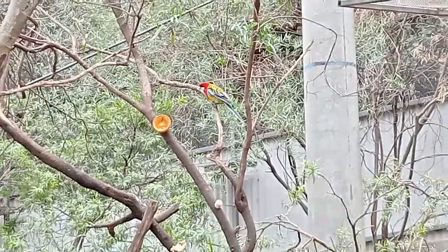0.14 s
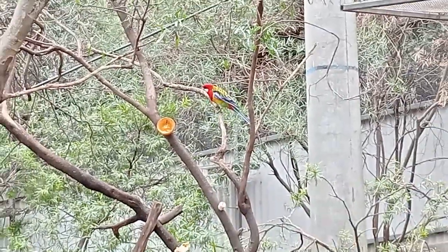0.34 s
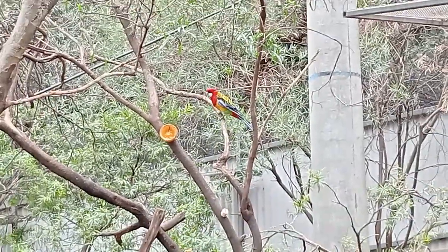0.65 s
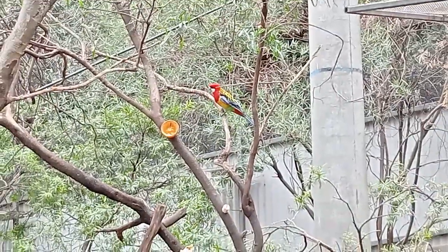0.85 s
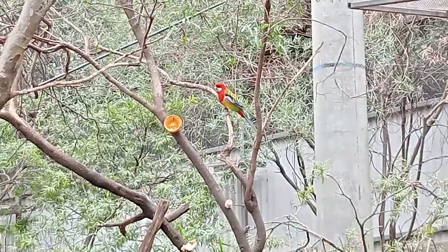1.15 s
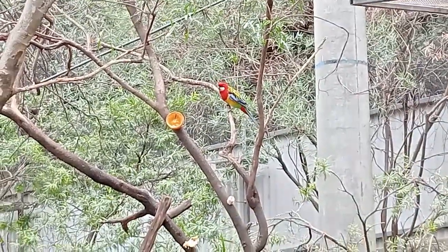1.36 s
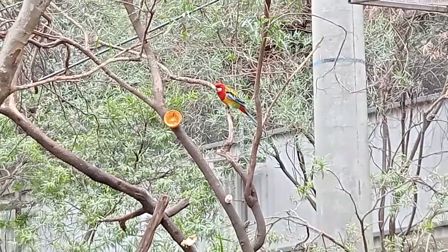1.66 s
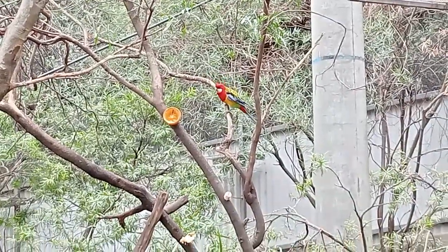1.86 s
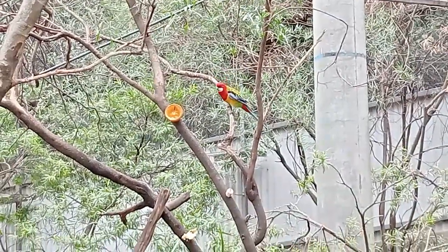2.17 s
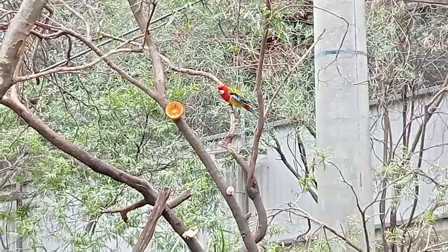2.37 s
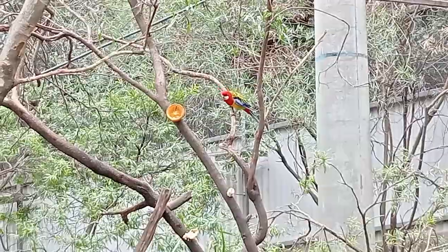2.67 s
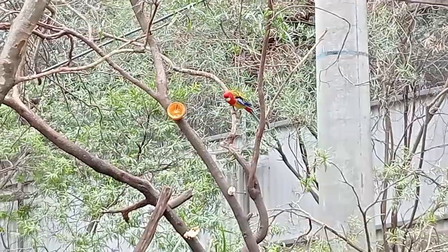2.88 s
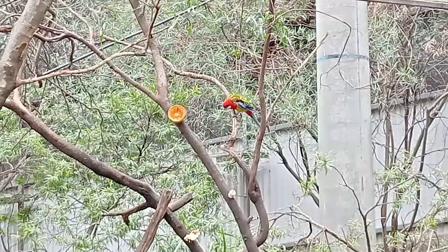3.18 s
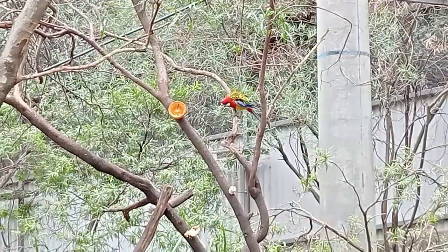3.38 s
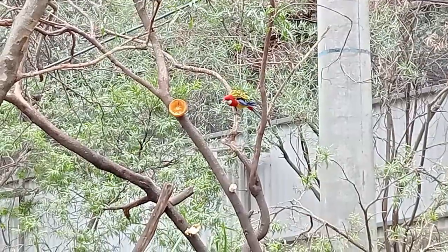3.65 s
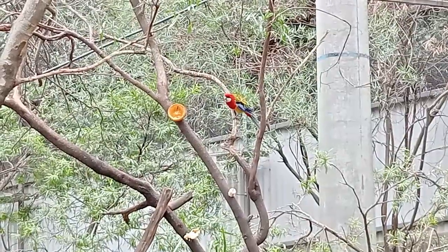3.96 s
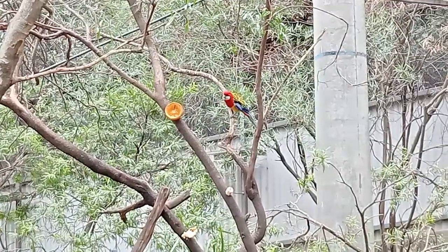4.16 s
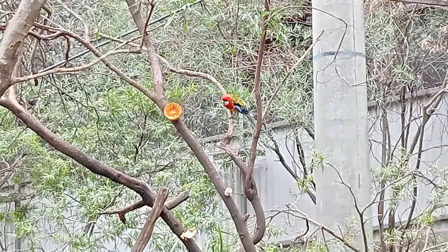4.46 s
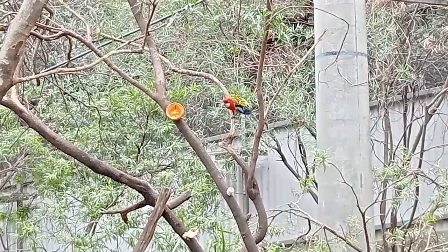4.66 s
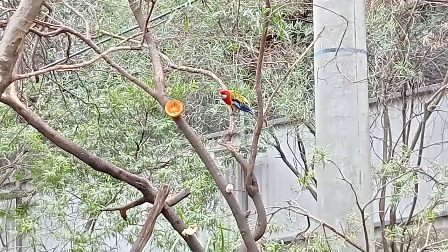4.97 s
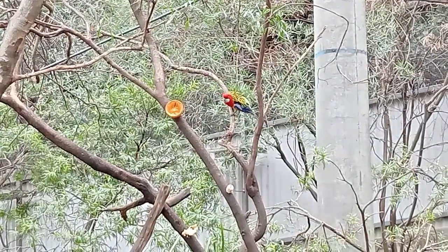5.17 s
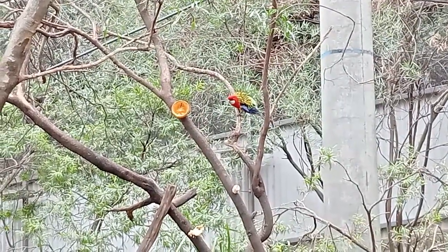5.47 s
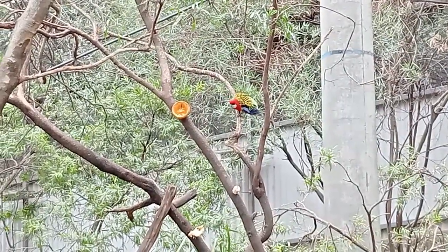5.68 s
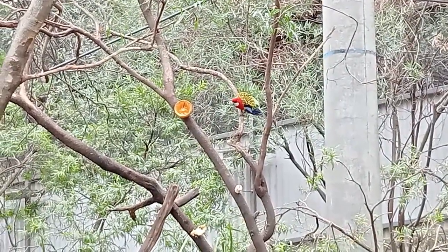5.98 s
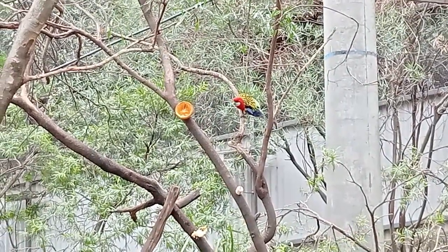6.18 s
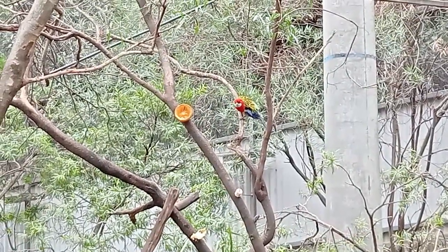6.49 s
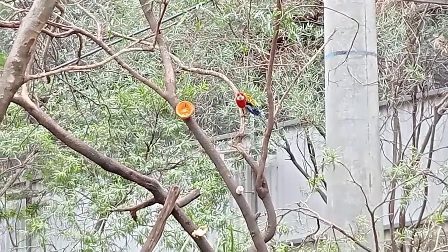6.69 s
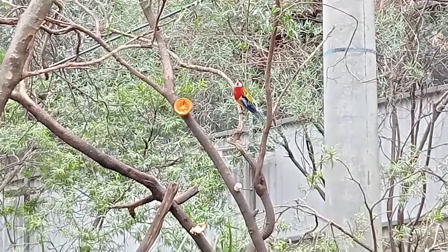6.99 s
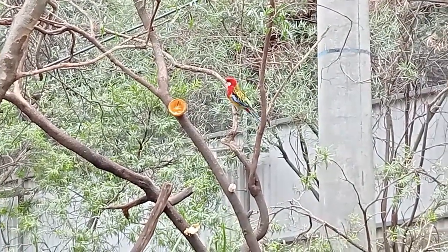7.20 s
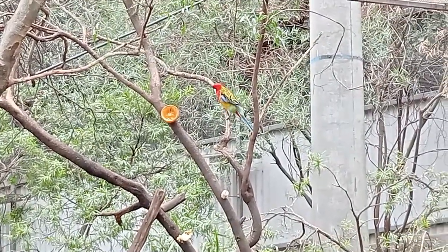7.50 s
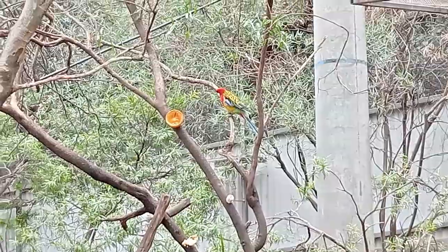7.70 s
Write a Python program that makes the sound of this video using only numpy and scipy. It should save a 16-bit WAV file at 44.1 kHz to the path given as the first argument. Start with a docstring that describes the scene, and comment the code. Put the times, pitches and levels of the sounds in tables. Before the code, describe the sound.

Outdoors among trees and walls, a parrot's clear, upward-scooping hoots stand out in front: three at first, then after a gap a steady run of eight. Softer whoops and hoarse, sinking wails come from farther away, with thin squeaks, whistles and rasps from other birds. A brief screech and a high whistle come just before the hoots resume. Very faint insect buzzing and leaf rustle lie underneath, and the calls echo lightly.

```python
"""A parrot among trees repeats short, nearly pure hoots, each one sliding up in pitch and drooping.
Whoops, lower hoots and hoarse, falling calls answer from farther off. Other birds squeak, whistle,
squawk and rasp above it, and one screeches; their unsteady voices make the pitch flutter.
An insect's clicking wings give two bouts of buzzing, and leaves rustle.
Walls and trees echo over a faint outdoor hush."""
import sys
import numpy as np
from scipy import signal
from scipy.fft import rfft, irfft, next_fast_len
from scipy.io import wavfile
from scipy.ndimage import map_coordinates

SR = 44100
rng = np.random.default_rng(int(sys.argv[2]) if len(sys.argv) > 2 else 0)


def put_to_file(sound):
    """Save the sound as 16-bit audio at rate SR, in the file named by the first command-line argument."""
    columns = np.atleast_2d(sound).T  # one column per channel
    safe = np.clip(columns, -1, 1)
    whole_steps = np.round(safe * 32767)
    wavfile.write(sys.argv[1], SR, whole_steps.astype(np.int16))


N = 345744


def amp(db):
    """Turn decibels (dB) into a number to multiply a sound by."""
    return 10 ** (np.asarray(db) / 20)


def unit(x):
    """Scale x so that its average strength (rms) is 1."""
    return x / np.sqrt(np.mean(x ** 2) + 1e-20)


def add(track, s, sound):
    """Mix a sound into the track, starting at s seconds."""
    start = int(np.clip(s * SR, 0, N))
    track[start:start + len(sound)] += sound[:N - start]


def coloured(x, points):
    """Turn the lows and highs of x up or down along a curve of (Hz, dB) points."""
    hz, db = np.transpose(points)
    size = next_fast_len(len(x) + 4096)
    gain = amp(np.interp(np.log(np.fft.rfftfreq(size, 1 / SR) + 1), np.log(hz), db))
    return irfft(rfft(x, size) * gain, size)[:len(x)]


def wobble(count, rate):
    """A smooth curve, count samples long, through rate random values a second."""
    values = rng.standard_normal(int(count * rate / SR) + 4)
    return map_coordinates(values, [np.arange(count) * rate / SR])


def progress(length):
    """A straight climb from 0 to 1 over a length in seconds."""
    return np.linspace(0, 1, max(int(length * SR), 64))


def ramp(t, seconds):
    """A smooth rise from 0 to 1 in the given time."""
    return np.sin(np.pi / 2 * np.clip(t / seconds, 0, 1)) ** 2


def around_top(u, top_at):
    """Two curves over a call's progress u: one falls from 1 to 0 up to the top, one rises after it."""
    return np.maximum(1 - u / top_at, 0), np.maximum((u - top_at) / (1 - top_at), 0)


def gates(rows, soft):
    """A loudness curve with one soft-edged swell for each row of start, length (seconds) and dB."""
    gain = np.zeros(N)
    for s, length, db in rows:
        add(gain, s, amp(db) * signal.windows.tukey(len(progress(length)), soft))
    return gain


def throbbing(count, hz):
    """The uneven beat of a rasping voice, between -1 and 1."""
    return np.sin(2 * np.pi * np.cumsum(hz * (1 + 0.19 * wobble(count, 60))) / SR)


def tone(hz, overtones_db=()):
    """A tone that follows the pitch curve hz; any overtones lie at 2, 3, .. times that pitch."""
    phase = 2 * np.pi * np.cumsum(hz) / SR
    partials = enumerate([0, *overtones_db], 1)
    return np.sqrt(2) * sum(amp(db) * np.sin(k * phase) * (k * hz < SR / 2) for k, db in partials)


def calls(rows, rough, flutter_hz, overtones_db=(), taper=0.14, arch_oct=0):
    """Gliding or arched notes; a bird's unsteady voice box makes their pitch and loudness flutter."""
    voice = np.zeros(N)
    tremble_db = min(100 * rough, 2.5)
    for s, length, pitch_hz, glide_oct, db in rows:
        u = progress(length)
        octaves = glide_oct * (u - .5) - arch_oct * (2 * u - 1) ** 2
        hz = pitch_hz * 2 ** octaves * (1 + rough * wobble(len(u), flutter_hz))
        swell = np.abs(np.sin(np.pi * u)) ** taper * amp(db + tremble_db * wobble(len(u), flutter_hz))
        add(voice, s, swell * tone(hz, overtones_db))
    return voice


def echo(x, t60, delay):
    """Sound scattered by trees and walls: it starts after delay seconds and fades 60 dB in t60 seconds."""
    t = np.arange(SR) / SR
    tail = rng.standard_normal(SR) * amp(-60 * t / t60) * (t > delay)
    return signal.fftconvolve(x, tail / np.linalg.norm(tail))[:N]


def hush():
    """Far outdoor noise, and one soft low bump of air on the microphone."""
    # The tone colour of the far noise. Each row: frequency in Hz, relative level in dB.
    air_colour = [(22, -43), (45, -15.5), (100, -4), (300, -7), (1000, -7.5), (3500, -20.5), (8000, -23.5),
                  (15400, -25)]
    air = unit(coloured(rng.standard_normal(N), air_colour)) * amp(-65 + 3.0 * wobble(N, 13))
    bump = unit(coloured(rng.standard_normal(N), [(30, -50), (70, -5.5), (700, -54.5)]))
    return air + bump * gates([(.03, .13, -60)], soft=0.31)


def breeze(lull_db=-5):
    """A loudness curve for the moving air: steady, but sinking in the lulls."""
    # Moments when the air falls still. Each row: start in seconds, length in seconds.
    lulls = [(0.994, .28), (5.427, 0.54), (6.058, 0.23)]
    return amp(lull_db * gates([(s, length, 0) for s, length in lulls], soft=0.7))


def foliage(crackles_per_s=220, crackle_db=15):
    """Leaves stir and brush together with tiny snaps; twigs and beaks give short, dry ticks."""
    # Leaves brushing, and at 2.22 s a bird's brief scratchy squeak. Each row: start in seconds, length in
    # seconds, relative level in dB.
    rustles = [(.54, 0.032, -68), (.945, 0.044, -69.5), (2.22, 0.021, -64), (2.345, 0.048, -68.5),
               (2.43, 0.049, -65.5), (3.37, 0.1, -65.5), (6.445, 0.079, -65), (7.45, 0.042, -67.5)]
    # The tone colour of the leaves. Each row: frequency in Hz, relative level in dB.
    leaf_colour = [(500, -17.5), (1700, 2.5), (8000, -10.5), (15000, -21.5)]
    # Twig and beak ticks. Each row: start in seconds, relative level in dB, strongest frequency in Hz.
    ticks = [(4.769, -62.5, 7600), (4.886, -59.5, 8500), (5.242, -61.5, 8250), (5.306, -60, 6000),
             (6.285, -59, 14200)]
    snaps = rng.random(N) < crackles_per_s / SR
    grains = rng.standard_normal(N) * (amp(0.89 * wobble(N, 500)) + amp(crackle_db) * snaps)
    stir = amp(-74.5 + 2.2 * wobble(N, 14))  # the treetops never quite rest
    sound = (gates(rustles, soft=0.19) + stir) * unit(coloured(grains, leaf_colour))
    t = np.arange(SR // 20) / SR
    for s, db, hz in ticks:
        tick = unit(coloured(rng.standard_normal(len(t)), [(hz / 2, -24), (hz, 0), (hz * 2.1, -24)]))
        add(sound, s, tick * amp(db - 60 * t / 0.056))
    return amp(4.5) * sound + amp(-1.0) * echo(sound, t60=0.24, delay=0.0057)


def insect(wing_hz=85.3):
    """Tiny, high wing clicks blur into buzzes, which repeat evenly and grow until the bout breaks off."""
    # Bouts of buzzing. Each row: start in seconds, level it grows toward in dB.
    bouts = [(1.296, -66), (5.253, -62.5)]
    # The clicks of one wingbeat. Each row: place in the beat from 0 to 1, relative level in dB.
    wing_clicks = [(0, -3), (0.458, -1), (.66, -0.5)]
    # The tone colour of the buzz. Each row: frequency in Hz, relative level in dB.
    buzz_colour = [(9600, -18.5), (10500, -0.5), (13300, -7), (15000, -18)]
    bout_s, period_s, buzz_s, growth_db_per_s = .75, .138, 0.11, 12
    beats = np.cumsum(wing_hz * (1 + 0.0077 * wobble(N, 22))) / SR
    strokes = sum(amp(db) * np.diff(np.floor(beats - place), prepend=0) for place, db in wing_clicks)
    clicks = signal.lfilter([1], [1, -np.exp(-1 / (.0003 * SR))], strokes)  # each gets a tiny tail
    scrape = (clicks + 0.091) * rng.standard_normal(N)
    buzzes = [(s + t, min(buzz_s, bout_s - t), db - growth_db_per_s * (bout_s - t))
              for s, db in bouts for t in np.arange(0, bout_s, period_s)]
    sound = gates(buzzes, soft=0.23) * unit(coloured(scrape, buzz_colour))
    return sound + amp(-3.5) * echo(sound, t60=0.28, delay=.003)


def rasps():
    """Thin, rasping calls: bursts of high hiss whose loudness flickers."""
    # Rasping calls. Each row: start in seconds, length in seconds, level in dB.
    bursts = [(.14, 0.11, -66), (1.39, 0.2, -65.5), (2.66, 0.17, -70), (2.85, 0.41, -68.5),
              (3.2, 0.31, -67.5), (5.08, 0.14, -73), (6.46, 0.24, -69), (6.88, 0.25, -65)]
    # The tone colour of a rasp. Each row: frequency in Hz, relative level in dB.
    rasp_colour = [(4500, -17), (6300, -0.5), (7500, 5), (8100, -5.5), (9200, -23.5)]
    hiss = unit(coloured(rng.standard_normal(N), rasp_colour))
    return gates(bursts, soft=0.26) * hiss * amp(2.1 * wobble(N, 120))


def husky_tones():
    """Thin, husky high tones: whistles and the blurred overtones of other calls."""
    # Each row is a tone: start and length in seconds, pitch in Hz, glide in octaves, level in dB.
    notes = [(1.38, 0.18, 3496, -.17, -65.5), (2.84, 0.18, 5980, .03, -63), (2.88, 0.14, 9500, -.07, -66.5),
             (3.82, 0.18, 4010, 0.056, -65), (3.945, 0.12, 6670, -0.016, -69.5),
             (7.362, 0.055, 1973, 0.035, -66)]
    return calls(notes, rough=.03, flutter_hz=1001)


def nasal_calls():
    """Calls that sound nasal because the overtone an octave up is their strongest part."""
    # Each row is a call: start and length in seconds, pitch in Hz, glide in octaves, level in dB.
    notes = [(3.48, 0.23, 2837, 0.11, -64.5), (4.39, 0.061, 2187, 0, -68.5)]
    return calls(notes, rough=0.0128, flutter_hz=267, overtones_db=[3, -6])


def whistles():
    """Distant whistles, clear because the voice barely flutters."""
    # Each row is a note: start and length in seconds, pitch in Hz, glide in octaves, relative level in dB.
    notes = [(1.355, 0.044, 4830, -0.13, -64), (2.46, 0.084, 2397, -0.11, -67),
             (2.76, 0.083, 3830, -0.4, -73), (2.83, 0.084, 3720, 0.17, -66),
             (2.92, .088, 3210, 0.038, -57.5), (4.83, 0.053, 2880, -.02, -71.5),
             (5.285, 0.067, 4920, -0.079, -67), (5.29, 0.086, 1898, -0.25, -67.5),
             (5.3, 0.042, 5900, -0.092, -71), (5.425, 0.044, 3150, 0.068, -70.5),
             (6.85, 0.042, 3770, -0.13, -69), (7.69, 0.037, 7900, 0.067, -71),
             (7.76, 0.091, 2380, 0.11, -68)]
    return calls(notes, rough=.007, flutter_hz=196, overtones_db=[-18], taper=0.37)


def mews():
    """Soft, falling notes, rich in overtones."""
    # Each row is a mew: start and length in seconds, pitch in Hz, glide in octaves, relative level in dB.
    notes = [(2.715, 0.051, 1022, -0.11, -66.5), (2.84, .074, 992, -0.036, -65),
             (5.075, .05, 1060, -0.102, -64.5)]
    return calls(notes, rough=.014, flutter_hz=192, overtones_db=[-2, -13, -8], taper=0.41)


def squawks(rise_oct=0.128, ring_hz=5270, throb_db=3):
    """Each squawk is a hoarse, throbbing, rising note; some have a narrower ring high above it."""
    # Each row is a squawk: start and length in seconds, pitch in Hz, level in dB, ring strength 0 to 1.
    notes = [(0, 0.059, 2698, -51, 0), (0, 0.026, 1890, -46, 0.02), (0.451, 0.064, 2130, -60, 0.4),
             (1.702, 0.076, 1855, -61.5, 0.46), (2.97, 0.25, 3690, -55.5, 0), (3.321, .1, 4100, -52, 0.55),
             (3.379, 0.085, 2450, -58, 1), (3.385, 0.043, 5270, -52, 0), (3.984, 0.15, 4390, -63, 0),
             (4.078, .12, 2134, -63.5, 0.1), (4.336, 0.078, 2002, -51, 0.57),
             (7.248, 0.12, 2044, -63, 0.43)]
    voice = np.zeros(N)
    for s, length, pitch_hz, db, ring_strength in notes:
        u = progress(length)
        hz = pitch_hz * 2 ** (rise_oct * (u - .5)) * (1 + .085 * wobble(len(u), 503))
        note = tone(hz, overtones_db=[-23, -22])
        ring = tone(ring_hz * (1 + .04 * wobble(len(u), 600)))
        throb = throbbing(len(u), hz=140)
        swell = np.abs(np.sin(np.pi * u)) ** .5 * amp(db + throb_db * throb + 1.1 * wobble(len(u), 200))
        add(voice, s, swell * (note + ring_strength * ring))
    return voice


def chatter():
    """Short syllables, made hoarse by a wide, fast flutter."""
    # Each row is a note: start and length in seconds, pitch in Hz, glide in octaves, relative level in dB.
    notes = [(4.272, 0.025, 1756, -.4, -55.5), (6.765, 0.02, 1432, -1.1, -55),
             (6.781, .022, 1520, 0.36, -56), (7.272, .04, 1487, -0.43, -54),
             (7.315, 0.023, 1586, 0.73, -54.5)]
    return calls(notes, rough=.1, flutter_hz=802, overtones_db=[-17])


def squeaks():
    """Tiny, high notes nearby that slide quickly up or down."""
    # Each row is a note: start and length in seconds, pitch in Hz, glide in octaves, relative level in dB.
    notes = [(1.475, 0.027, 3900, 0.53, -56.5), (1.497, .016, 3640, -0.47, -57),
             (1.772, 0.03, 6070, -0.11, -54), (2.106, 0.051, 6140, -0.21, -50.5),
             (2.141, .011, 2110, 0.51, -54.5), (2.141, 0.014, 4660, 0.59, -46.5),
             (2.475, 0.024, 4730, 0.71, -57), (5.86, 0.029, 4850, -0.68, -61.5),
             (6.792, 0.033, 5340, -.5, -59.5), (7.312, 0.013, 5200, 0.31, -60)]
    return calls(notes, rough=.02, flutter_hz=284)


def piercing_whistle(start_s=2.945, pitch_hz=4637, fade_from_s=0.13, t60=0.76):
    """A steady high note that swells, holds and rings away through the screech."""
    t = np.arange(SR) / SR
    fade_db = -60 * np.maximum(t - fade_from_s, 0) / t60
    level = ramp(t, 0.042) * amp(-51 + fade_db + 3.4 * wobble(SR, 132.6))
    hz = pitch_hz * (1 + .012 * wobble(SR, 450))
    voice = np.zeros(N)
    add(voice, start_s, level * tone(hz, overtones_db=[-13]))
    return voice


def screech():
    """A rasping cry that climbs, clears at its top and breaks off downwards."""
    # The path of the cry. Each row: time in seconds, pitch in Hz, relative level in dB, roughness 0 to 1.
    path = [(2.947, 1603, -51.5, 0.04), (2.984, 1700, -46.5, 0.05), (3.025, 1989, -41.5, .08),
            (3.06, 2580, -46, 0.04), (3.085, 2843, -43, 0), (3.116, 2700, -47, 0.05),
            (3.13, 2450, -39.5, .08), (3.146, 1810, -45.5, 0.04), (3.157, 1354, -49, 0)]
    s, pitch, db, rough = np.transpose(path)
    t = np.arange(int((s[-1] - s[0]) * SR)) / SR + s[0]
    hoarse = np.interp(t, s, rough)
    hz = np.interp(t, s, pitch) * (1 + hoarse * wobble(len(t), 900))
    rasp_db = 3.5 * hoarse / rough.max() * throbbing(len(t), hz=170)
    level = amp(np.interp(t, s, db) + rasp_db + 1.5 * wobble(len(t), 400))
    voice = np.zeros(N)
    add(voice, s[0], level * tone(hz, overtones_db=[-11, -22]))
    return voice


def low_hoots():
    """Lower, plainer hoots whose pitch rises and falls in an even arch."""
    # Each row is a hoot: start and length in seconds, top pitch in Hz, level in dB.
    hoots = [(1.642, 0.036, 602, -48.5), (2.939, 0.177, 572.6, -51), (3.636, 0.092, 578, -55),
             (4.835, 0.17, 603, -55.5), (7.108, 0.179, 583, -49), (7.248, 0.14, 575, -58),
             (7.652, 0.21, 603, -52.5)]
    notes = [(s, length, hz, 0, db) for s, length, hz, db in hoots]
    return calls(notes, rough=.014, flutter_hz=72.6, taper=1.47, arch_oct=0.292)


def other_birds():
    """The smaller calls together: all but the piercing whistle echo, and near ones also reflect quickly."""
    low = low_hoots()
    near = squeaks() + chatter()
    clear = amp(1.5) * (whistles() + mews())
    far = nasal_calls() + husky_tones() + rasps() + squawks()
    near += screech()
    reflections = amp(-4.0) * echo(near, t60=0.2, delay=0)
    long_echo = amp(-12.0) * echo(near + low, t60=1.0, delay=0.037)
    far_echo = echo(amp(-2.5) * far + amp(-2) * clear, t60=0.9, delay=0.014)
    direct = low + piercing_whistle() + amp(-3) * near + far + clear
    return direct + reflections + long_echo + far_echo


def wails(fall_share=.37, strand_gap=.095, sag_db=9, attack_s=0.021, release_s=0.28):
    """Calls that start hoarse and throbbing, then clear into a plain tone that falls ever faster."""
    # Each row is a call: start and length in seconds, first pitch in Hz, level in dB,
    # and the share of its length that is hoarse.
    notes = [(0, 0.49, 953, -52.5, 0.79), (1.799, 0.53, 622, -60, 0.7), (2.089, 0.58, 667.3, -47, 0.48),
             (2.399, 0.37, 666, -54, 0.41), (4.088, 0.26, 664, -53.5, 0.88),
             (4.161, 0.53, 916, -53.5, 0.68), (4.336, .4, 686.5, -47, 0.3), (5.1, 0.52, 633, -53, 0.32),
             (6.25, 0.58, 673.8, -46.5, .47), (7.731, .45, 821, -52, .6)]
    voice = np.zeros(N)
    for s, length, start_hz, db, hoarse_until in notes:
        u = progress(length)
        hz = start_hz * (1 - fall_share * u ** 2.2) * (1 + .018 * wobble(len(u), 45.23))
        hoarse = 1 / (1 + np.exp((u - hoarse_until) / 0.019))
        # the voice splits into three wandering strands that beat against each other
        offsets = [strand_gap * (k + 0.57 * wobble(len(u), 72.13)) for k in (-1, 0, 1)]
        strands = sum(tone(hz * (1 + offset)) for offset in offsets)
        throb = amp(3.6 * np.sin(2 * np.pi * 28 * u * length))
        sound = np.sqrt(hoarse) * unit(strands * throb) + np.sqrt(1 - hoarse) * tone(hz)
        fades = ramp(u * length, attack_s) * ramp((1 - u) * length, release_s) ** .5
        add(voice, s, amp(db - sag_db * u) * fades * sound)
    return voice + amp(-6.5) * echo(voice, t60=0.77, delay=0.014)


def whoops(drop_share=0.25):
    """An answering whoop climbs and swells to a firm accent, then drops and stops."""
    # Each row is a whoop: start and length in seconds, top pitch in Hz, top level in dB,
    # climb as a share of the top pitch, swell up to the top in dB.
    notes = [(1.595, 0.2, 757.6, -40.5, 0.45, 37.5), (3.881, 0.076, 725, -35.5, 0.031, 12.5),
             (5.828, .175, 746.5, -40.5, .33, 19), (7.448, .19, 723, -42, 0.15, 19.5)]
    voice = np.zeros(N)
    for s, length, top_hz, db, climb, swell_db in notes:
        u = progress(length)
        before, after = around_top(u, top_at=.78)
        arch = 1 - climb * before ** 1.4 - drop_share * after ** 2.7
        hz = top_hz * arch * (1 + 0.01 * wobble(len(u), 118))
        fades = ramp(u * length, 0.0076) * ramp((1 - u) * length, 0.016)
        add(voice, s, amp(db - swell_db * before ** 1.15) * fades * tone(hz))
    return voice


def parrot():
    """Each hoot starts as a murmur, opens as it scoops up to its top pitch, then droops and shuts."""
    # Each row is a hoot: start and length in seconds, top pitch in Hz, level at the top in dB,
    # swell over its length in dB.
    hoots = [(0, 0.24, 868, -33, 2), (0.582, 0.21, 861.6, -32.5, 5.5), (1.168, 0.18, 871, -33.5, 2),
             (3.378, 0.22, 831, -36.5, 11), (3.944, 0.23, 833.4, -34, 3), (4.512, 0.22, 856.6, -32, 5),
             (5.072, 0.22, 852.7, -32, 6.5), (5.645, .23, 863.4, -32.5, 3.5),
             (6.229, 0.23, 866, -32.5, 1.5), (6.796, 0.23, 863.7, -32.5, 3.5), (7.407, 0.21, 851, -32.5, 4)]
    scoop, droop = .34, 0.0748  # shares of the top pitch
    open_at, open_width, shut_at = 0.27, 0.03, 0.99  # shares of the length
    murmur_db, shut_s, tail_s = -25.5, 0.0061, .035
    voice = np.zeros(N)
    for s, length, top_hz, db, swell_db in hoots:
        u = np.arange(int((length + tail_s) * SR)) / (length * SR)  # runs past 1 while the voice shuts
        before, after = around_top(u, top_at=.72)
        arch = 1 - scoop * before ** 2.15 - droop * after ** 3.76
        hz = top_hz * arch * (1 + 0.0031 * wobble(len(u), 88))
        opening = amp(murmur_db) + 1 / (1 + np.exp((open_at - u) / open_width))
        shutting = 1 / (1 + np.exp((u - shut_at) * length / shut_s))
        level = amp(db + swell_db * (u - .72) + 0.74 * wobble(len(u), 91.6))
        add(voice, s, opening * shutting * level * tone(hz))
    return voice


def parrot_and_answers():
    """A wall repeats the parrot's hoots; near and far surfaces scatter both hoots and whoops."""
    hoots = parrot()
    wall = np.zeros(N)
    add(wall, .068, amp(-17.0) * hoots)
    voices = hoots + whoops()
    near_echo = amp(-9) * echo(voices, t60=0.39, delay=0.0035)
    far_echo = amp(-28.0) * echo(voices, t60=0.71, delay=0.191)
    return voices + wall + near_echo + far_echo


def scene():
    """All sources at one microphone; the leaves and the hush follow the breeze."""
    animals = parrot_and_answers() + wails() + other_birds() + insect()
    return (animals + breeze() * (foliage() + hush()))[None]


def record(dry, top_hz=15550):
    """The recorder keeps nothing higher than top_hz."""
    size = next_fast_len(N + SR // 2)
    kept = np.fft.rfftfreq(size, 1 / SR) < top_hz
    return irfft(rfft(dry, size) * kept, size)[:, :N]


dry = scene()
out = record(dry)
put_to_file(out)
```